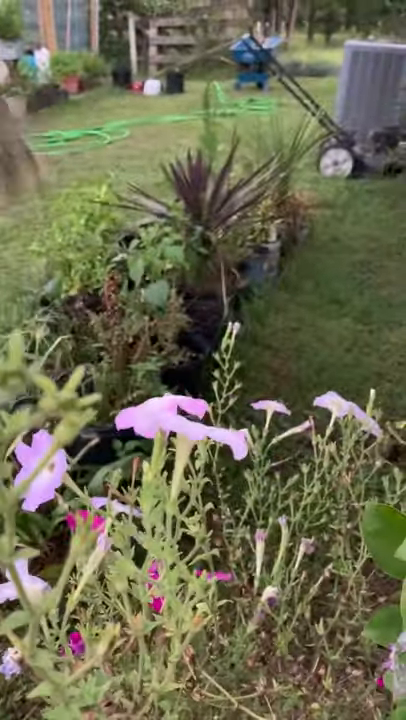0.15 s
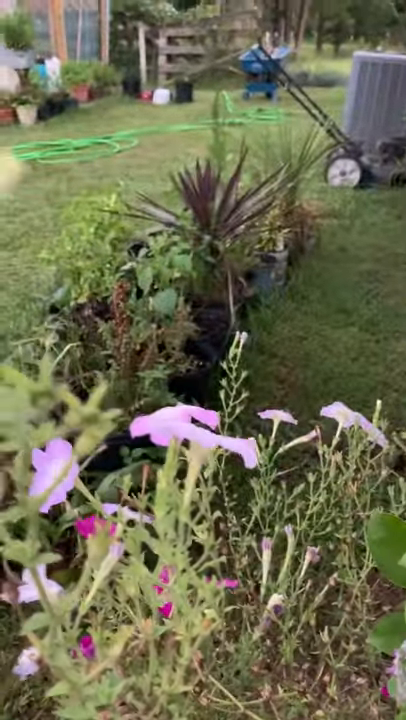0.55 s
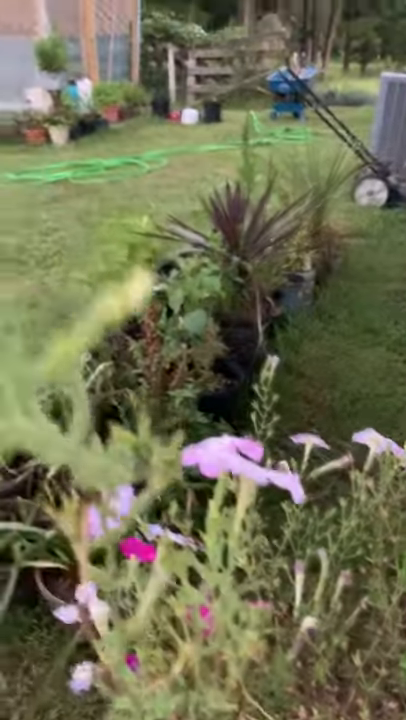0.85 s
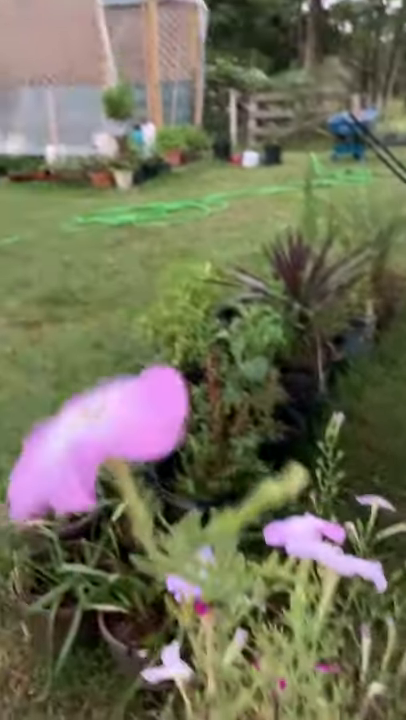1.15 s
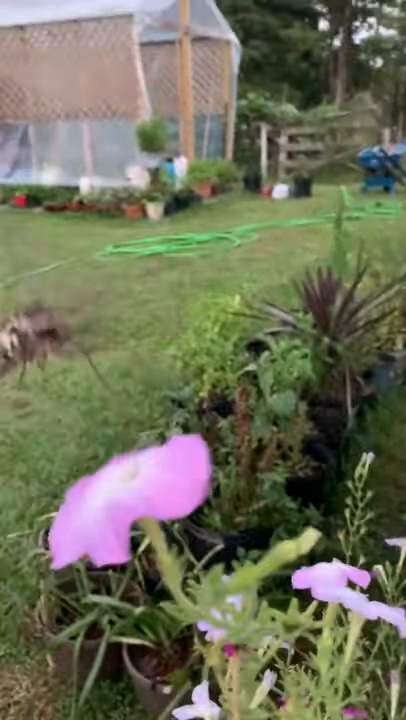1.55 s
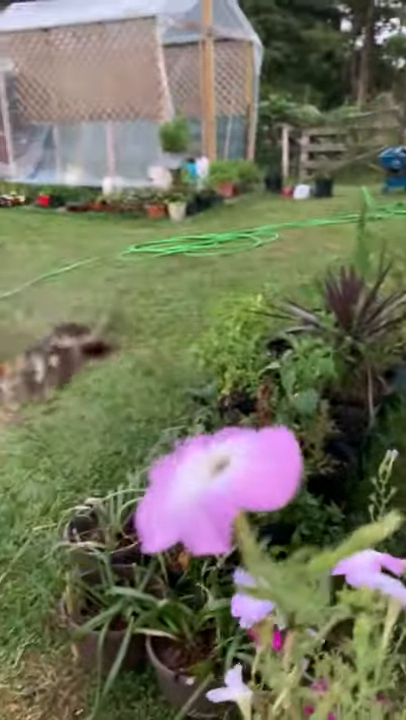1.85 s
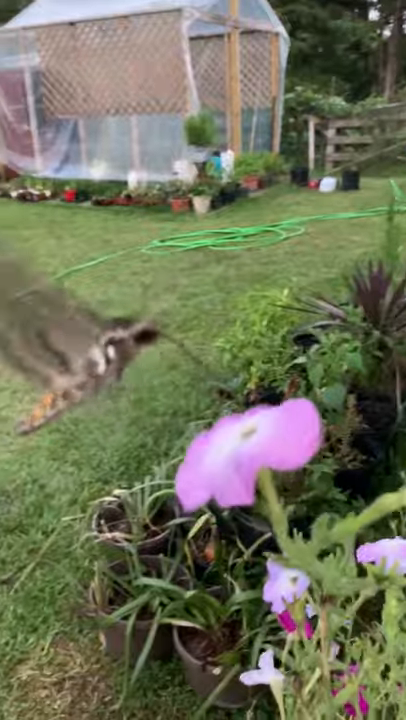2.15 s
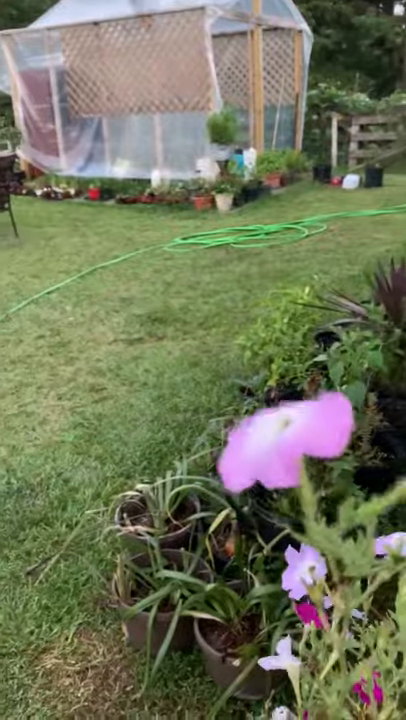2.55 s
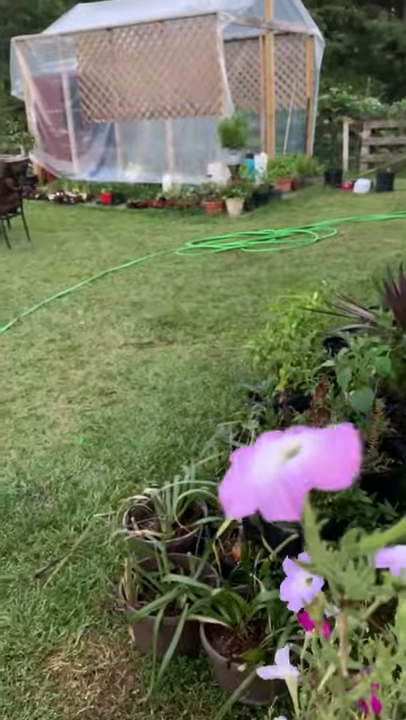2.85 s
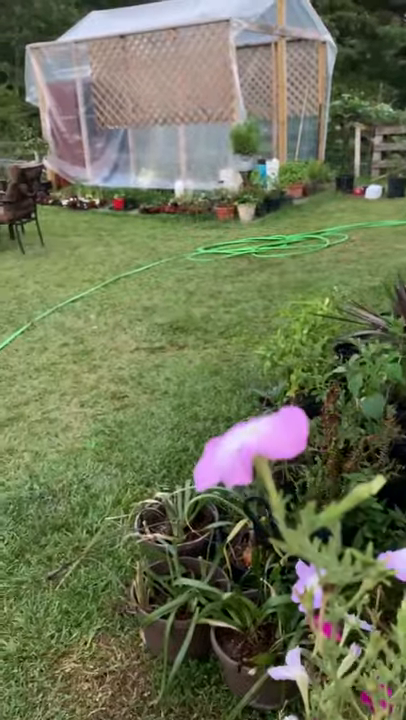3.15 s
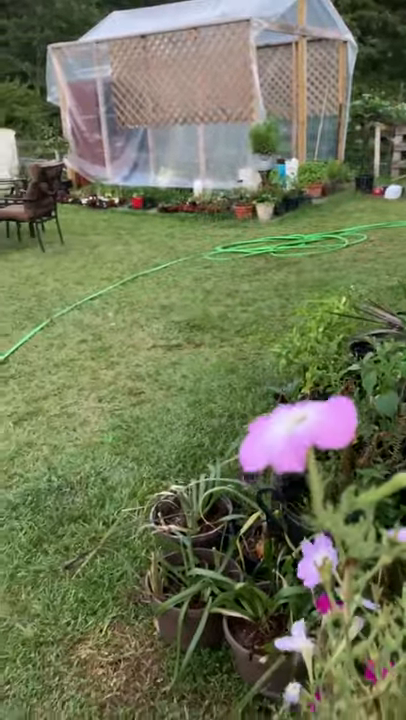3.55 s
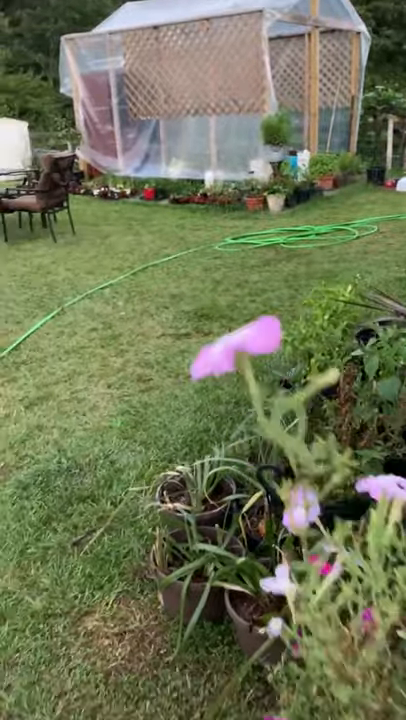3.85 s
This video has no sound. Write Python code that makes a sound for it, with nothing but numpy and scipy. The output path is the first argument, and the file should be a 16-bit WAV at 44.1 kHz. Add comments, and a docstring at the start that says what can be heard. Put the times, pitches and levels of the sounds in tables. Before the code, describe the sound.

Crickets and other insects keep up a steady, high trill in a garden. A moth hovers by the microphone with a low flutter, clips a leaf with a light tap, then sweeps right past near the end.

```python
"""Crickets throb at 7 kHz in a summer garden; a katydid ticks a fast dry trill, both with their wings.
A cicada's tymbals rattle far off, over still air. A hawk moth hovers at flowers by the microphone,
each wingbeat a soft puff of air. Its wings clip a leaf near 0.9 s; it sweeps right past near 3 s.
Foliage brushes and rustles softly. Brief swells of hiss near 11-13 kHz make a faint high crackle."""
import sys
import numpy as np
from scipy import signal
from scipy.fft import rfft, irfft
from scipy.io import wavfile
from scipy.ndimage import uniform_filter1d

SR = 44100
rng = np.random.default_rng(int(sys.argv[2]) if len(sys.argv) > 2 else 0)


def dump(signal):
    """Clip the signal to [-1, 1] and save it as 16-bit WAV at the path in sys.argv[1]."""
    limited = np.clip(np.atleast_2d(signal).T, -1, 1)
    pcm = np.round(limited * 32767).astype(np.int16)
    wavfile.write(sys.argv[1], SR, pcm)


N = 176400
T = np.arange(N) / SR
HZ = np.arange(N // 2 + 1) * SR / N

# massed cricket spectrum: f/Hz, level/dB
CRICKET_BAND = [(5900, -6.5), (6500, -2), (6850, 6), (7400, 7), (7600, -37)]
# katydid tick spectrum: f/Hz, level/dB
TICK_BAND = [(6000, -15), (8800, 21), (11000, -50), (13400, 16), (15600, 17)]
# tick fade: t/s, level/dB
TICK_FADE = [(2.2, 3), (2.9, -2)]
# distant katydid spectrum: f/Hz, level/dB
CHORUS_BAND = [(3900, -24), (4400, -13), (4800, -11), (5400, -9), (5800, -12), (7400, -8), (7850, 0),
               (8300, -4.5), (8790, -1), (9150, -12), (9900, -9.5), (10700, -36), (11800, -37),
               (13400, -24), (16000, -25)]
# cicada rattle spectrum: f/Hz, level/dB
CICADA_BAND = [(1800, -22.5), (2700, -5), (3600, 1.5), (5200, -29)]
# cicada body resonances: f/Hz, level/dB
CICADA_TONES = [(2640, -2), (2830, -1), (2945, -1), (3260, 1), (3390, -6), (3640, -1)]
# left microphone port's lead over the right: f/Hz, phase/rad
PORT_PHASE = [(0, 0), (2300, 2.6), (3700, 1.3), (4550, 3.05), (5100, 3.25), (6400, 6.2), (7400, 6.4),
              (8900, 9.3), (9300, 9.5), (10600, 12.5), (11700, 12.6), (12700, 15.6), (13500, 15.8),
              (15000, 18.8)]
# still air spectrum: f/Hz, level/dB
AIR_BAND = [(20, -31), (100, 5.5), (200, -13), (400, -16), (900, -24), (1700, -23), (16000, -79)]
# moth wingbeat rate: t/s, f/Hz
WING_RATE = [(0, 24.74), (.6, 25.88), (.9, 24.17), (1.4, 26.48), (2, 24.2), (2.42, 24.58), (2.52, 28.55),
             (2.65, 24.09), (2.85, 23.86), (3.02, 28.84), (3.1, 22.03), (3.17, 27.69), (3.23, 22.42),
             (3.32, 28.14), (4, 24.71)]
# wing puffs: t/s, downstroke level/dB, upstroke re downstroke/dB
WING_PUFFS = [(0, -59.5, 0), (.28, -41, -1.5), (.43, -59, 2), (.52, -35.5, -9), (.68, -37, -12.5),
              (.95, -39.5, -9), (1.38, -42, 1), (1.52, -44.5, -5.5), (1.95, -42.5, -10), (2.15, -45.5, 2),
              (2.58, -39, -6.5), (2.77, -49.5, -6.5), (2.87, -34.5, -28), (2.97, -18, -12),
              (3.03, -15.5, -12), (3.12, -23.5, -5.5), (3.18, -19.5, -11.5), (3.31, -27.5, -9),
              (3.49, -58.5, -4.5)]
# flight unsteadiness: t/s, amount/0-1
FLUTTER = [(.3, 1), (.55, .4), (1.3, .8), (1.6, .5), (2.2, .1)]
# wake eddy spectrum: f/Hz, level/dB
EDDY_BAND = [(30, 9), (70, 10), (120, 0), (210, -16), (600, -36), (1200, -52)]
# wing edge rasp spectrum: f/Hz, level/dB
RASP_BAND = [(190, 0), (650, -19)]
# brushes on plants: t/s, level/dB, width/s
BRUSHES = [(.252, -59, 0.015), (2.329, -61.5, 0.011), (2.62, -76, 0.087), (2.761, -71.5, 0.011)]
# brush spectrum: f/Hz, level/dB
BRUSH_BAND = [(250, 0), (700, -12), (1400, 5), (1800, 0.5), (4500, -52)]
# wing strikes on a leaf: t/s, level/dB, decay/s
STRIKES = [(.8745, -35, .004), (.9108, -25, .003), (.9215, -34, .008), (2.981, -56, .004)]
# leaf modes: f/Hz, width/Hz, level/dB
LEAF_MODES = [(260, 380, -3), (720, 95, 5), (1430, 190, 3), (1930, 600, 4), (3000, 230, 3), (4200, 450, 0)]
# brief swells of high hiss: t/s, level/dB, rise/s
CRACKLES = [(1.11, -66, .014), (1.23, -67, .04), (1.36, -64.5, .06), (1.707, -56.5, .005), (2.06, -66, .03),
            (2.182, -59, .005), (2.27, -70, .1), (2.395, -68, .035)]
# high crackle spectrum: f/Hz, level/dB
CRACKLE_BAND = [(7000, -4), (11200, 8), (13000, 2), (16000, -17)]
# foliage rustle spectrum: f/Hz, level/dB
RUSTLE_BAND = [(90, 0), (300, 2.5), (680, -12), (1750, -7.5), (2600, -25)]


def undb(db):
    """Decibels to gain."""
    return 10 ** (np.asarray(db) / 20)


def unit(x):
    """Scale to rms 1."""
    return x / np.sqrt(np.mean(x ** 2))


def curve(table, column=1):
    """Table column over time."""
    rows = np.array(table)
    return np.interp(T, rows[:, 0], rows[:, column])


def colour(x, band):
    """Filter by a spectrum, steep skirts outside it; rms 1."""
    hz, db = np.array(band).T
    f = np.maximum(HZ, 1)
    skirts = np.minimum(f / hz[0], 1) ** 4 * np.minimum(hz[-1] / f, 1) ** 8
    gain = undb(np.interp(np.log(f), np.log(hz), db)) * skirts
    return unit(irfft(rfft(x) * gain, N))


def noise(correlation):
    """Stereo white noise."""
    common = np.sqrt(correlation) * rng.standard_normal(N)
    return common + np.sqrt(1 - correlation) * rng.standard_normal((2, N))


def drift(rate_hz):
    """Smooth random signal, spread near 1."""
    hold = int(SR / rate_hz)
    steps = np.repeat(rng.standard_normal(N // hold + 1), hold)
    return 1.3 * uniform_filter1d(uniform_filter1d(steps, hold), hold)[:N]


def sine(hz):
    """Sine of varying frequency."""
    return np.sin(2 * np.pi * np.cumsum(hz) / SR)


def bell(offset_s, width_s):
    """Gaussian envelope."""
    return np.exp(-.5 * (offset_s / width_s) ** 2)


def burst(start_s, rise_s, decay_s):
    """Linear rise, exponential fall."""
    age_s = T - start_s
    return np.clip(age_s / rise_s, 0, 1) * np.exp(-np.maximum(age_s - rise_s, 0) / decay_s)


def crickets(pitch_hz=7111, stroke_hz=63.35, chirp_hz=3.92, sag=.046, tone_share=.69):
    """Near crickets: a sagging tone per wing stroke. More blur behind; all throb together."""
    tones = 0
    for detune in np.linspace(-.017, .017, 7):
        rate_hz = stroke_hz * (1 + .19 * rng.standard_normal() + .05 * drift(14))
        stroke = (np.cumsum(rate_hz) / SR + rng.random()) % 1
        hz = pitch_hz * (1 + detune + sag * (.5 - stroke) + .005045 * drift(150))
        tones += np.sin(np.pi * stroke) ** 2 * undb(3.5 * drift(25.01)) * sine(hz)
    blur = colour(noise(1), CRICKET_BAND)
    song = np.sqrt(tone_share) * unit(tones) + np.sqrt(1 - tone_share) * blur
    throb_db = 1.4 * np.cos(2 * np.pi * chirp_hz * (T - .055)) + .6 * drift(14)
    return undb(-51.3) * unit(song * undb(throb_db))


def katydids(tick_hz=32.91, decay_s=.003, recoil_s=.0036):
    """One katydid: a tick and weaker recoil per wing closure. A far chorus merges into hiss."""
    beat = (T - .018 + .00067 * drift(28)) * tick_hz
    age_s = beat % 1 / tick_hz
    recoil = undb(-4) * (age_s > recoil_s) * np.exp(-abs(age_s - recoil_s) / decay_s)
    ticks = (np.exp(-age_s / decay_s) + recoil) * undb(curve(TICK_FADE) + 2 * drift(29.8))
    chorus = colour(noise(.98), CHORUS_BAND) * undb(.6 * drift(40) + .3 * drift(3))
    return undb(-70) * colour(ticks * noise(1), TICK_BAND) + undb(-53.3) * chorus


def cicada(throb_hz=36.74, tymbal_hz=427, waver=.006):
    """Tymbal clicks in fast throbs, smeared by distance; body resonances ring and waver."""
    throb = undb(-1.64 * np.cos(2 * np.pi * throb_hz * T))
    clicks = 1 + .15 * np.cos(2 * np.pi * tymbal_hz * T)
    tones = sum(undb(db + 5.1 * drift(60)) * sine(hz * (1 + waver * drift(200)))
                for hz, db in CICADA_TONES)
    rattle = colour(noise(.41) * throb * clicks, CICADA_BAND)
    return undb(-62.5) * rattle + undb(-64.5) * unit(tones) * throb


def ports(x):
    """Sound from one side reaches the two microphone ports out of phase."""
    lead_rad = np.interp(HZ, *np.array(PORT_PHASE).T)
    return irfft(rfft(x) * np.exp(.5j * lead_rad * np.array([[1], [-1]])), N)


def still_air():
    """Faint low hush all round."""
    return undb(-70.5 + 1.4 * drift(6.9)) * colour(noise(.072), AIR_BAND)


def moth(far_width_s=.0031, near_width_s=.0018, up_width_s=.0026, bass_cut_hz=16.4):
    """An air puff per stroke; downstrokes sharpen close by. Flutter jolts beats, stirs eddies."""
    rate_hz, level_db, flutter = curve(WING_RATE), curve(WING_PUFFS), curve(FLUTTER)
    beat = np.cumsum(rate_hz) / SR + .06 * flutter * drift(20)

    def puff(phase, width_s):
        return bell(((beat - phase + .5) % 1 - .5) / rate_hz, width_s)

    nearness = undb(level_db - level_db.max())
    down_width_s = far_width_s + (near_width_s - far_width_s) * np.sqrt(nearness)
    down = puff(0, down_width_s) * undb(2.8 * flutter * drift(29.94))
    up_phase = .553 + .057 * flutter * drift(8)
    up = puff(up_phase, up_width_s) * undb(curve(WING_PUFFS, column=2) + 2 * drift(20))
    eddies = undb(-23 + 13 * flutter) * colour(noise(1), EDDY_BAND)
    rasp = undb(-41) * colour(noise(.46), RASP_BAND)
    wake = (eddies + rasp) * (.5 + puff(0, 2 * down_width_s))
    air = (down + up + wake) * undb(level_db)
    bass_cut = HZ ** 3 / (HZ ** 3 + bass_cut_hz ** 3) * 1j * HZ / (1j * HZ + bass_cut_hz)
    return irfft(rfft(air) * bass_cut, N) * undb([[-.3], [.3]])


def brushes():
    """Soft brushes against the plants."""
    swells = sum(undb(db) * bell(T - at_s, width_s) for at_s, db, width_s in BRUSHES)
    return swells * colour(noise(.66), BRUSH_BAND)


def leaf_strikes(rise_s=.0012, scrape_at_s=.918, shelf_hz=4700, shelf_db=-6):
    """Wings crack and scrape on a leaf; it rings at its modes and damps the treble above."""
    cracks = sum(undb(db) * burst(at_s, rise_s, decay_s) for at_s, db, decay_s in STRIKES)
    scrape = bell(T - scrape_at_s, width_s=.042) * undb(-48 + 3.2 * drift(250))
    force = np.hypot(cracks, scrape) * noise(.34)
    modes = sum(undb(db) * 1j * HZ * width_hz / (hz ** 2 - HZ ** 2 + 1j * HZ * width_hz)
                for hz, width_hz, db in LEAF_MODES)
    leaf = modes * undb(shelf_db * HZ ** 20 / (HZ ** 20 + float(shelf_hz) ** 20))
    leaf /= np.sqrt(np.mean(abs(leaf) ** 2))
    return irfft(rfft(force) * leaf, N) * undb([[-1.1], [1.1]])


def high_crackle():
    """Faint, brief swells of hiss near 11-13 kHz."""
    swells = sum(undb(db) * burst(at_s - rise_s / 2, rise_s, rise_s / 2)
                 for at_s, db, rise_s in CRACKLES)
    return swells * undb(5.2 * drift(250)) * colour(noise(.25), CRACKLE_BAND)


def rustle(start_s=3.72, rise_s=.094):
    """Low foliage rustle at the end."""
    fade_in = np.clip((T - start_s) / rise_s, 0, 1)
    return fade_in * undb(-65 + 2 * drift(40)) * colour(noise(.34), RUSTLE_BAND)


def scene():
    """Singing insects to one side, air all round, moth and leaves close."""
    air = still_air()
    insects = ports(crickets() + katydids() + cicada())
    return insects + air + moth() + brushes() + leaf_strikes() + high_crackle() + rustle()


def record(dry):
    """Recorder low-pass."""
    cutoff_hz = 15850
    return signal.sosfilt(signal.ellip(10, .2, 80, cutoff_hz, fs=SR, output="sos"), dry)


dry = scene()
out = record(dry)
dump(out)
```